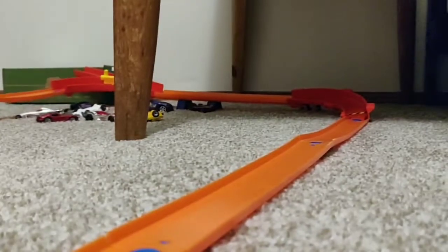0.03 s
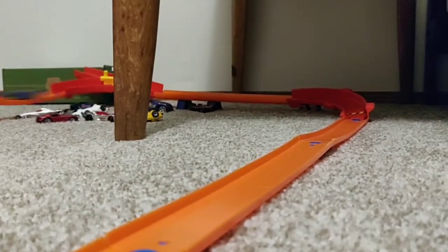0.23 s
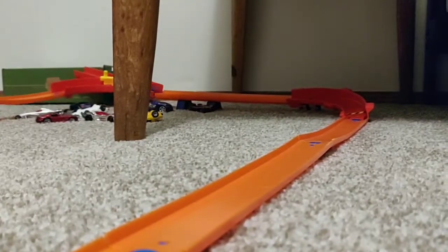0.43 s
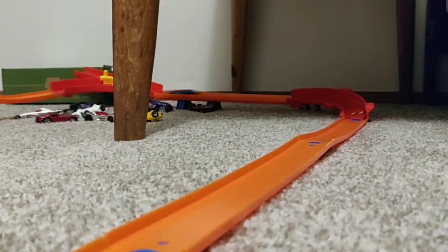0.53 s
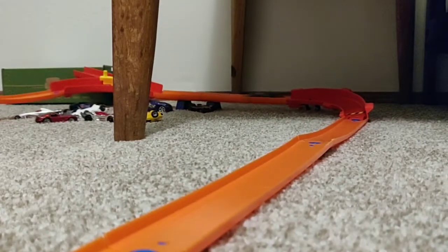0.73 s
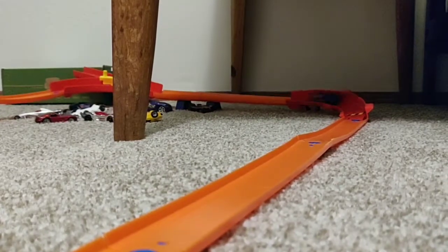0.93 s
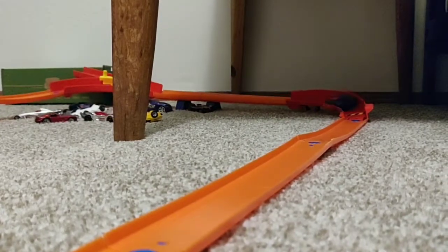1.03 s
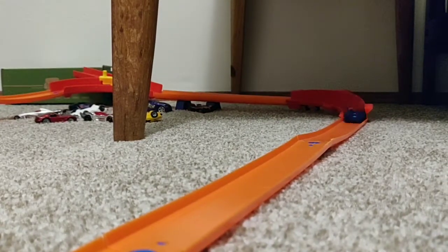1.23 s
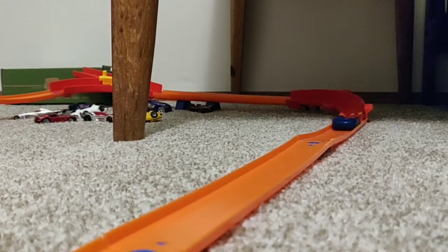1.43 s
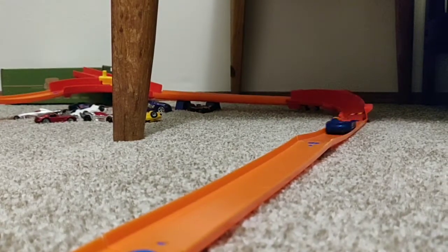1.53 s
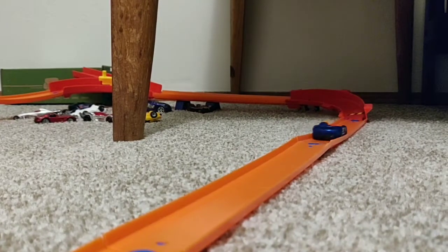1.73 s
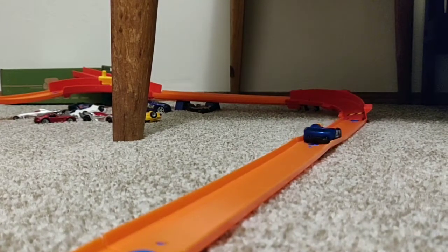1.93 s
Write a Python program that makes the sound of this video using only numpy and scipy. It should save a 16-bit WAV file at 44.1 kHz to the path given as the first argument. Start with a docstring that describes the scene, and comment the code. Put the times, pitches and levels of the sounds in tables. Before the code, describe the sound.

A small metal toy car rattles fast over hollow plastic track, with sharp clacks and thumps early on, another knock near one second, then faint ticks as it slows in a quiet carpeted room, close stereo microphone.

```python
"""A small metal toy car rolls along a hollow plastic track on carpet and slows down in a quiet furnished room.
Random taps ring a metal body model: dense for wheel rattle, dying bursts for clacks at joints and walls.
Bumps and thumps ring track modes; shaped noise makes tyre whirr and a low drone.
Random-tap tails give the echoes; room air is shaped noise, with a faint low sine hum."""
import sys
import numpy as np
from scipy import signal
from scipy.fft import rfft, irfft
from scipy.io import wavfile

SR = 44100
rng = np.random.default_rng(int(sys.argv[2]) if len(sys.argv) > 2 else 0)


def to_wav(s):
    """Save 16-bit WAV."""
    ch = np.atleast_2d(s).T  # columns
    pcm = np.round(np.clip(ch, -1, 1) * 32767)  # PCM
    wavfile.write(sys.argv[1], SR, pcm.astype(np.int16))


N = 88200


def amp(db):
    """Amplitude ratio of a dB level."""
    return 10 ** (np.asarray(db) / 20)


def unit_rms(x):
    """Scale to rms 1."""
    return x / np.sqrt(np.mean(x ** 2) + 1e-20)


def read(points, hz):
    """Interpolate a table over log frequency."""
    f, value = np.transpose(points)
    return np.interp(np.log(hz + 1), np.log(f + 1), value)


def minimum_phase(db, size=1024):
    """Pulse with the given dB spectrum, its energy as early as possible."""
    log_gain = np.log(amp(np.concatenate([db, db[-2:0:-1]])))
    phase = -signal.hilbert(log_gain).imag
    return np.fft.ifft(np.exp(log_gain + 1j * phase)).real[:size]


def ring(modes, size=6000):
    """Sum of decaying sines that start together, energy 1; t60 is at least 5 ms."""
    t = np.arange(size) / SR
    x = np.zeros(size)
    for hz, db, t60_s in modes:
        x += amp(db - 60 * t / max(t60_s, .005)) * np.sin(2 * np.pi * hz * t)
    return x / np.linalg.norm(x)


def taps(per_s, spread_db, size=N):
    """Random impulses of uneven size and sign, rms 1."""
    rise_db = spread_db * np.minimum(rng.exponential(1, size), 4)
    height = amp(rise_db) * rng.choice([-1., 1.], size)
    return unit_rms(height * (rng.random(size) < per_s / SR))


def paired(draw, apart):
    """Two channels: a common random sound plus an independent one of amplitude share apart."""
    common, share = draw(), np.clip(apart, 0, 1)
    return np.array([np.sqrt(1 - share ** 2) * common + share * draw() for ear in range(2)])


def fuzzy(peaks):
    """Noise shaped by a few resonances, rms 1."""
    hz = np.fft.rfftfreq(N, 1 / SR)
    shape = sum(amp(db) / (1 + (2 * (hz - f) / width_hz) ** 2) for f, width_hz, db in peaks)
    return unit_rms(irfft(rfft(rng.standard_normal(N)) * shape, N))


def add(mix, start_s, sound):
    """Add a sound to the mix in place."""
    start = round(start_s * SR)
    part = mix[..., start:start + sound.shape[-1]]
    part += sound[..., :part.shape[-1]]


def blow(body, first_db, after_db, after, t60_s, hold_s, skid_s):
    """A short noisy skid and a dying flurry of smaller taps ring a body."""
    t = np.arange(after.shape[-1]) / SR
    flurry = after * amp(after_db - 60 * np.maximum(t - hold_s, 0) / max(t60_s, .01))
    skid = rng.choice([-1., 1.], len(t)) * np.exp(-t / skid_s)
    contact = amp(first_db) / abs(body).max() * skid / np.linalg.norm(skid)
    return signal.fftconvolve(flurry + contact, body[None], axes=1)


# Rolling drive levels: (time [s], wheel rattle [dB], track rumble [dB], low drone [dB], tyre whirr [dB],
# rumble centre [Hz])
ROLLING = [(0.0, -39, -49, -55, -68, 547), (0.071, -48.5, -64, -58, -75, 324),
           (0.111, -48.5, -50.5, -61, -63, 350), (0.17, -38, -50, -55, -80, 394),
           (0.21, -39, -43.5, -62, -72, 400), (0.28, -39.5, -48.5, -49.5, -54, 383),
           (0.33, -44.5, -50.5, -53, -63, 326), (0.42, -40.5, -51, -52, -67, 347),
           (0.47, -36, -42, -41, -45, 343), (0.52, -34, -80, -72, -34.5, 505),
           (0.549, -39.5, -50, -44, -47.5, 500), (0.6, -41, -48, -52, -46, 363),
           (0.63, -45.5, -48.5, -47, -56, 283), (0.68, -47.5, -63, -49, -54.5, 400),
           (0.75, -54.5, -60.5, -59.5, -57, 288), (0.92, -60, -60.5, -66, -62, 414),
           (0.94, -41.5, -68, -48.5, -68, 402), (1.02, -53.5, -53, -54.5, -59, 251),
           (1.15, -55.5, -59, -57, -60.5, 267), (1.29, -56, -56, -55.5, -67, 247),
           (1.38, -54.5, -54, -49.5, -70, 223), (1.44, -60.5, -57, -55.5, -76, 277),
           (1.61, -70, -75, -60.5, -74, 266), (1.66, -68, -74, -55, -77, 215),
           (1.8, -68.5, -61, -60, -76, 304), (2.0, -81.5, -75, -57.5, -93, 229)]


def curve(column):
    """One rolling column, interpolated over time."""
    return np.interp(np.arange(N) / SR, [r[0] for r in ROLLING], [r[column] for r in ROLLING])


# Contact tick spectrum of the metal car: (frequency [Hz], relative level [dB per Hz])
CAR_TICK = [(530, -42), (900, -6.5), (1400, -10), (2190, -2), (2700, 4), (3300, 1.5), (5000, -2.5),
            (6200, -0.5), (7500, -3.5), (8800, -5.5), (10600, -10.5), (13000, -11), (15000, -6.5),
            (17000, -20)]
# Metal rings of the car, before random spread: (frequency [Hz], relative level [dB], t60 [s])
CAR_RINGS = [(2260, -15.5, 0.013), (2652, -11.5, 0.026), (2879, 6.5, 0.028), (3400, 1.5, 0.0115),
             (4190, -2.5, 0.0091), (5050, 6, 0.0033), (5840, -17, 0.0067), (6230, 0, 0.03),
             (6496, 2.5, 0.017), (7090, 0, 0.012), (8910, -9.5, 0.015)]
CAR_RING_DB = -5  # ring energy re tick
RING_SPREAD_DB, RING_SPREAD_RATIO = 3.0, .015


def car_body(tilt_db_per_oct):
    """A tick and short metal rings, slightly different at each call, energy 1."""
    hz = np.fft.rfftfreq(2048, 1 / SR)
    lean = lambda f: tilt_db_per_oct * np.log2(np.clip(f, 500, 16000) / 5000)
    tick = minimum_phase(read(CAR_TICK, hz) + lean(hz))
    modes = []
    for f, db, t60_s in CAR_RINGS:
        detune, lift = rng.standard_normal(2)
        modes.append((f * (1 + RING_SPREAD_RATIO * detune), db + RING_SPREAD_DB * lift + lean(f), t60_s))
    body = amp(CAR_RING_DB) * ring(modes, size=2000)
    body[:len(tick)] += tick / np.linalg.norm(tick)
    return body / np.linalg.norm(body)


RATTLE_PER_S, RATTLE_SPREAD_DB = 5000, 3.0  # four wheels together
TICKS_PER_S, TICK_SPREAD_DB, TICKS_RE_RATTLE_DB = 350, 3.5, -7
CAR_APART = .85  # amplitude share each ear hears from another part of the car


def wheel_rattle():
    """Dense taps and sparser ticks of four wheels ring the metal body."""
    out = np.zeros((2, N))
    for wheel in range(4):
        rattle = paired(lambda: taps(RATTLE_PER_S / 4, RATTLE_SPREAD_DB), CAR_APART)
        ticks = amp(TICKS_RE_RATTLE_DB) * taps(TICKS_PER_S / 4, TICK_SPREAD_DB)
        drive = amp(curve(column=1)) * (rattle + ticks)
        out += signal.oaconvolve(drive, car_body(0)[None], axes=1)[:, :N] / 2
    return out


# Hollow track modes, before spread and damping: (frequency [Hz], relative level [dB], t60 [s])
TRACK_RINGS = [(164.6, -11, 0.089), (209, -6, 0.048), (256, -10.5, 0.091), (317, -6, 0.048),
               (352.6, 3.5, 0.041), (414, 2, 0.025), (503, -1.5, 0.029), (580, -3.5, 0.046),
               (626, 3.5, 0.03), (704, 1, 0.03), (887, 8.5, 0.0059), (1034, 5, 0.0123), (1250, 4.5, 0.017),
               (1700, 6, 0.009)]
TRACK_SPREAD_RATIO, TRACK_LONGEST_S = .035, .042


def track_piece():
    """Modes of one piece of track, each detuned at random, t60 capped."""
    detune = rng.standard_normal(len(TRACK_RINGS))
    return [(f * (1 + TRACK_SPREAD_RATIO * d), db, min(t60_s, TRACK_LONGEST_S))
            for (f, db, t60_s), d in zip(TRACK_RINGS, detune)]


RING_FALL_DB = -9  # at one width from the centre


def near(hz, centre_hz, width_oct):
    """Mode level falls with squared octave distance from the centre, to a floor; width at least 0.1 octave."""
    distance = np.log2(hz / centre_hz) / max(width_oct, .1)
    return RING_FALL_DB * np.minimum(distance ** 2, 4.5)


CARPET_HZ = 135


def carpet_damped(x):
    """The carpet damps the track's low end: third-order high-pass."""
    return signal.sosfilt(signal.butter(3, CARPET_HZ, "high", fs=SR, output="sos"), x)


BUMPS_PER_S, BUMP_SPREAD_DB = 1500, 2.0  # four wheels together
TRACK_APART = 0.27  # independent amplitude share per ear
RUMBLE_WIDTH_OCT = 1
LOADED_RING = .6  # ring-time factor while the wheels press on the track


def track_rumble():
    """Wheel bumps ring the loaded track, mode levels following a moving centre."""
    out = np.zeros((2, N))
    centre_hz = curve(column=5)
    for wheel in range(4):
        bumps = paired(lambda: taps(BUMPS_PER_S / 4, BUMP_SPREAD_DB), TRACK_APART)
        bumps *= amp(curve(column=2)) / 2
        for k, (f, db, t60_s) in enumerate(track_piece()):
            drive = bumps * amp(db + near(f, centre_hz, RUMBLE_WIDTH_OCT))
            mode = (-1) ** k * ring([(f, 0, LOADED_RING * t60_s)], size=2500)
            out += signal.oaconvolve(drive, mode[None], axes=1)[:, :N]
    return carpet_damped(out)


# Tyre hiss resonances: (frequency [Hz], width [Hz], relative level [dB])
TYRE_PEAKS = [(1627, 150, 0.5), (2180, 830, 3.5)]


def whirr():
    """Tyres hiss on the plastic: resonant noise, the same in both ears."""
    return amp(curve(column=4)) * fuzzy(TYRE_PEAKS)


# Low rolling resonances: (frequency [Hz], width [Hz], relative level [dB])
DRONE_PEAKS = [(116, 36, 2.5), (147.7, 50, -2), (206, 100, -6.5), (275, 140, -9)]
DRONE_APART = 0.25  # independent amplitude share per ear


def drone():
    """Low, lumpy resonant noise whose level follows the roll."""
    return amp(curve(column=3)) * paired(lambda: fuzzy(DRONE_PEAKS), DRONE_APART)


# Room hush spectrum: (frequency [Hz], relative level [dB per Hz])
HUSH = [(20, -10), (45, -23), (65, -12), (100, -4), (130, -23.5), (260, -4), (400, -6), (600, -10.5),
        (900, -14), (1400, -21.5), (2000, -27.5), (2550, -32), (2870, -17), (3200, -25.5), (3700, -30),
        (5200, -30), (6300, -37), (7500, -27.5), (11000, -32.5), (15500, -28)]
# Hush left-right correlation: (frequency [Hz], likeness [-1 to 1])
HUSH_LIKENESS = [(60, 0.85), (240, 0.1), (950, 0.64), (3770, -0.35), (15000, -0.78)]
AIR_RMS_DB = -60


def air():
    """Steady hush: shaped noise, partly correlated between ears."""
    hz = np.fft.rfftfreq(N, 1 / SR)
    a, b = rfft(rng.standard_normal((2, N)))
    same = np.clip(read(HUSH_LIKENESS, hz), -1, 1)
    pair = np.array([a, same * a + np.sqrt(1 - same ** 2) * b])
    shape = amp(read(HUSH, hz)) * (hz > 15)
    return amp(AIR_RMS_DB) * unit_rms(irfft(pair * shape, N))


HUM_HZ, HUM_RMS_DB = 33.8, -65.5


def house_hum():
    """Faint low hum of the house: one steady sine, random phase."""
    t = np.arange(N) / SR
    return amp(HUM_RMS_DB) * np.sqrt(2) * np.sin(2 * np.pi * (HUM_HZ * t + rng.random()))


# Clacks on joints and walls: (time [s], first contact drive [dB], chatter drive [dB], chatter t60 [s],
# brightness [dB per octave])
CLACK_EVENTS = [(.0014, -49, -41, 0.34, 3.5), (0.089, -23.5, -36.5, 0.026, -1),
                (0.095, -49, -34, 0.023, 0.5), (.1040, -33, -32, 0.089, 2.5), (0.1807, -32, -31, 0.055, 3),
                (0.194, -37, -37, .05, 4), (0.2066, -4.5, -19, 0.045, 2), (0.2128, -20, -17, 0.051, 1),
                (0.2182, -10, -21, 0.03, 6), (0.2223, -12, -25, 0.021, 7), (0.227, -28, -26.5, 0.23, 2.5),
                (0.2609, -28, -34, 0.21, 2.5), (0.3384, -18.5, -35, 0.21, 5), (.4450, -26, -28.5, 0.1, 6),
                (0.4507, -2, -18, 0.16, 6), (0.456, -6, -22, 0.018, -0.5), (.4620, -5, -24, 0.17, -0.5),
                (0.513, -24, -35, 0.062, 6), (0.522, -33, -38, 0.71, 2.5), (0.5603, -16.5, -29.5, 0.069, 6),
                (0.6179, -28, -33.5, 0.07, 3.5), (0.678, -28, -53, 0.061, 3), (0.7492, -30, -46, 0.041, 0),
                (0.831, -52, -64, 0.029, -15), (0.873, -54, -50, 0.16, 0.5),
                (0.9309, -24, -27, 0.016, -0.5), (0.9334, -14, -56, 0.1, 5), (.9402, -27, -33, 0.044, 23),
                (0.954, -33, -34.5, 0.085, 4.5), (.9660, -44, -43.5, 0.31, -3.5),
                (1.0045, -20.5, -39, 0.056, 4), (1.0196, -26, -47, 0.073, -0.5),
                (1.1022, -47, -47.5, 0.068, 7.5), (1.143, -40, -67, 0.055, -7),
                (1.1800, -28.5, -48.5, 0.15, 2.5), (1.2854, -32, -50, 0.15, 1),
                (1.3168, -35, -52, 0.074, 7), (1.364, -49, -60, .1, 7), (1.3715, -26, -42.5, 0.12, 3),
                (1.38, -46, -49.5, 0.2, 4), (1.398, -52, -50.5, 0.18, -1), (1.4402, -33, -51, .06, 7.5),
                (1.555, -48, -60, .06, 0.5), (1.616, -41.5, -70, .04, -1.5), (1.6294, -42.5, -70, .04, 4),
                (1.643, -54, -60.5, 0.053, -5), (1.833, -52, -61.5, .04, -1), (1.893, -52, -64, 0.044, -1)]
CHATTER_PER_S, CHATTER_SPREAD_DB = 5000, 1.5
CHATTER_HOLD_SHARE = 0.0067  # of t60, before the chatter decays
CRACK_S = .0005  # skid decay constant


def clacks():
    """Each joint or wall contact cracks and chatters the metal body."""
    out = np.zeros((2, N))
    for start_s, first_db, chatter_db, t60_s, tilt_db_per_oct in CLACK_EVENTS:
        chatter = paired(lambda: taps(CHATTER_PER_S, CHATTER_SPREAD_DB, size=8000), CAR_APART)
        hold_s = CHATTER_HOLD_SHARE * t60_s
        body = car_body(tilt_db_per_oct)
        add(out, start_s, blow(body, first_db, chatter_db, chatter, t60_s, hold_s, CRACK_S))
    return out


# Room decay: (frequency [Hz], t60 [s])
ROOM_DECAY = [(150, .14), (500, .11), (2000, .1), (6000, .08), (15000, .06)]
ROOM_DELAY_S, ROOM_MONO_HZ = .002, 407


def room(x):
    """Sparse random-sign taps, each band with its own decay; the ears share the bass."""
    size = SR // 2
    echo = rng.choice([-1., 1.], (2, size)) * (rng.random((2, size)) < 4000 / SR)
    hz, t, z = signal.stft(echo, SR, nperseg=128)
    same = 1 / (1 + (hz[:, None] / ROOM_MONO_HZ) ** 2)
    z = np.array([z[0], same * z[0] + np.sqrt(1 - same ** 2) * z[1]])
    decay = amp(-60 * t / np.maximum(read(ROOM_DECAY, hz), .03)[:, None])
    tail = signal.istft(z * decay, SR, nperseg=128)[1]
    tail = tail / np.linalg.norm(tail, axis=1, keepdims=True)
    tail = np.pad(tail, ((0, 0), (round(ROOM_DELAY_S * SR), 0)))
    return signal.fftconvolve(x[None], tail, axes=1)[:, :N]


PLACES_PER_S = 9


def moving_echoes(x):
    """Echoes change as the car moves: three room tails take turns at constant total power."""
    t = np.arange(N) / SR
    out = np.zeros((2, N))
    for k in range(3):
        turn = np.sqrt(2 / 3) * np.cos(np.pi * (PLACES_PER_S * t + k) / 3)
        out += room(x * turn)
    return out


# Thumps into the track: (time [s], contact drive before trim [dB], rumble t60 [s], ring centre [Hz],
# ring width [octaves])
THUMP_EVENTS = [(.004, -34.5, 0.057, 640, 0.33), (.104, -42, 0.11, 400, 0.21),
                (.118, -35.5, 0.21, 360, 0.085), (0.179, -28.5, 0.027, 426, 0.27),
                (.207, -29, 0.092, 530, 0.26), (.219, -26.5, 0.16, 408, 0.082),
                (0.4448, -19, 0.043, 446, 0.94), (.4497, -11, 0.031, 665, 1.5),
                (0.456, -15, 0.15, 350, 0.25), (0.465, -19, 0.042, 504, 0.44),
                (0.4748, -29, 0.036, 420, 0.37), (0.487, -25, 0.051, 380, 0.28),
                (.508, -16, 0.086, 516, 1.7), (.5125, -18.5, 0.059, 657, 0.33),
                (.518, -19.5, 0.053, 620, 0.63), (0.551, -22, 0.038, 483, 0.52),
                (0.591, -38, 0.042, 234.8, 0.34), (0.654, -28.5, 0.038, 335, 1.4),
                (.68, -32.5, 0.047, 770, 0.12), (0.743, -36.5, 0.093, 250, 0.3),
                (.9315, -35.5, 0.01, 606, 0.37), (0.9348, -21, 0.024, 480, 0.93),
                (0.947, -34.5, .04, 165, 0.33), (0.953, -35, 0.06, 347, 0.35), (.975, -35, 0.15, 300, 1),
                (1.018, -39, 0.077, 294, 0.72), (1.125, -39, 0.054, 262, 0.21),
                (1.174, -44, 0.076, 270, 0.8), (1.285, -44, .06, 250, 0.38), (1.362, -32, 0.037, 205, 0.22),
                (1.399, -40.5, 0.12, 742, 0.19)]
THUMP_TRIM_DB, AFTER_BUMPS_DB = -2, -12.5  # contact, after-bumps: each re the table's drive level
PUSH_S = .00005  # skid decay constant


def thumps():
    """Single pushes and dying bumps ring the hollow track near each thump's centre."""
    out = np.zeros((2, N))
    for start_s, db, t60_s, centre_hz, width_oct in THUMP_EVENTS:
        modes = [(f, g + near(f, centre_hz, width_oct), d) for f, g, d in track_piece()]
        after = paired(lambda: taps(BUMPS_PER_S, BUMP_SPREAD_DB, size=9000), TRACK_APART)
        body = ring(modes, size=2500)
        add(out, start_s, blow(body, db + THUMP_TRIM_DB, db + AFTER_BUMPS_DB, after, t60_s, 0, PUSH_S))
    return carpet_damped(out)


ECHO_RE_DIRECT_DB = -4


def scene():
    """Toy with echoes, power-normalised, over drone, air and hum."""
    toy = wheel_rattle() + clacks() + track_rumble() + thumps() + whirr()
    hum = house_hum()
    echoes = moving_echoes(toy.mean(0))
    toy_in_room = (toy + amp(ECHO_RE_DIRECT_DB) * echoes) / np.sqrt(1 + amp(2 * ECHO_RE_DIRECT_DB))
    return toy_in_room + drone() + air() + hum


# Microphone port colour, split equally between sides: (frequency [Hz], left minus right [dB])
PORT_DIFFERENCE = [(60, 1), (300, 3), (1200, 2), (1800, -1.5), (3000, 2), (4500, 3.5), (6200, 7.5),
                   (7300, 4.5), (8800, -14), (11000, -5.5), (15000, -5.5)]
LEFT_LAG_S, EDGE_HZ = .0001, 15650


def record(dry):
    """Two microphone ports of different colour, left delayed, then a low-pass band limit."""
    hz = np.fft.rfftfreq(4096, 1 / SR)
    ports = np.array([minimum_phase(side * read(PORT_DIFFERENCE, hz)) for side in (.5, -.5)])
    wet = signal.oaconvolve(dry, ports, axes=1)[:, :N]
    lag = np.exp(-2j * np.pi * np.fft.rfftfreq(N, 1 / SR) * LEFT_LAG_S)
    wet[0] = irfft(rfft(wet[0]) * lag, N)
    low_pass = signal.firwin(401, EDGE_HZ, window=("kaiser", 9), fs=SR)
    return signal.oaconvolve(wet, low_pass[None], "same")


dry = scene()
out = record(dry)
to_wav(out)
```